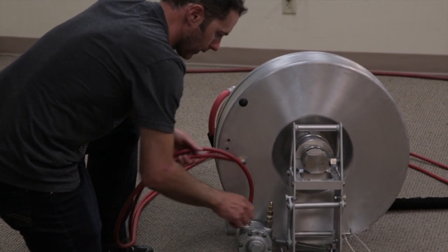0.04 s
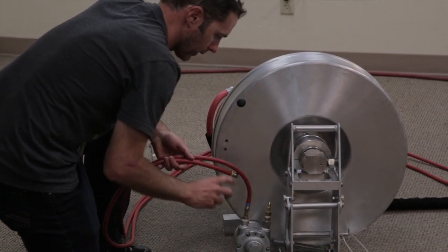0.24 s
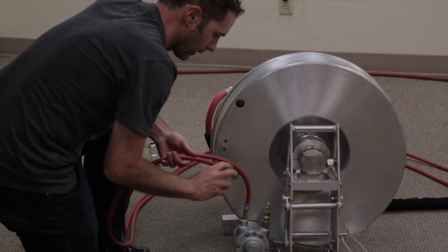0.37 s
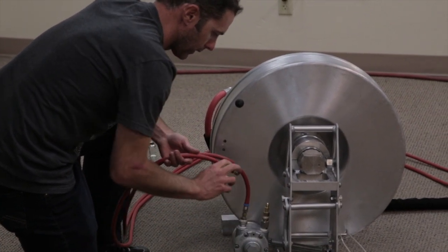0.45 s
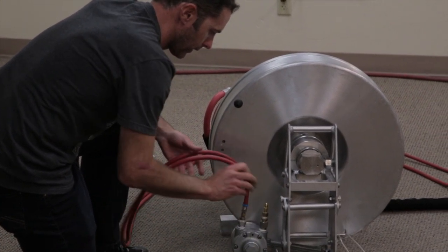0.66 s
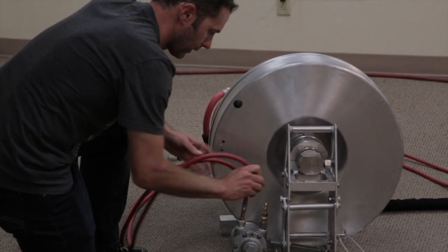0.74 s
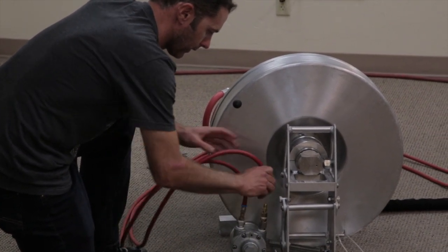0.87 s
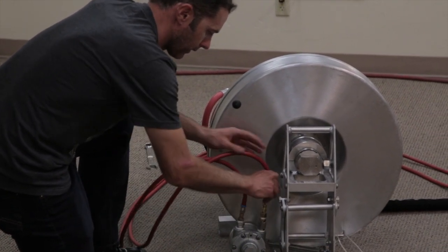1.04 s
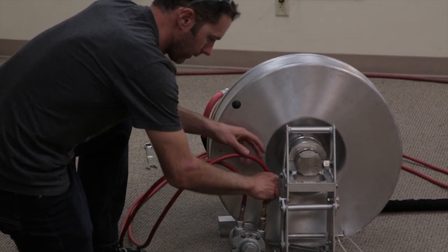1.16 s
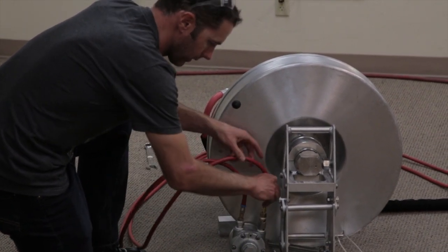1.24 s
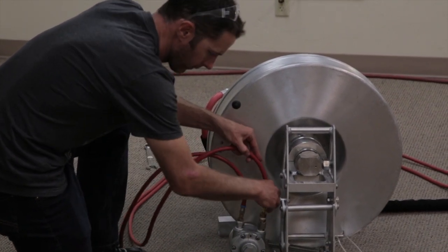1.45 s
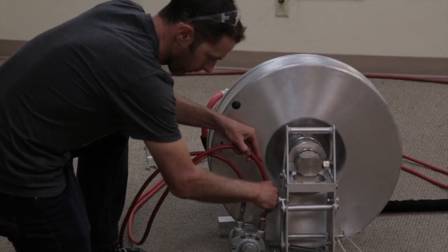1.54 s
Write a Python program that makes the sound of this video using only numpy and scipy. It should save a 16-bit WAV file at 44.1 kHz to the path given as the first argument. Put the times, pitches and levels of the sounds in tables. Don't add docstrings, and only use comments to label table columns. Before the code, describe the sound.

A metal hose coupling snaps loudly onto an air motor, then a second clicks and rattles

```python
import sys
import numpy as np
from scipy import signal
from scipy.io import wavfile

SR = 44100
rng = np.random.default_rng(int(sys.argv[2]) if len(sys.argv) > 2 else 0)


def generate_wav(sig):
    pcm = np.round(np.clip(np.atleast_2d(sig).T, -1, 1) * 32767).astype(np.int16)
    wavfile.write(sys.argv[1], SR, pcm)


def magnitude_from_level(level_db):
    exponent = np.asarray(level_db, float) / 20
    return 10 ** exponent


N = 70560

# [f/Hz, density/dB per Hz]
AIR_SPECTRUM = [(12, -43), (20, -20), (102, 10.5), (360, -10.5), (438, -13.5), (564, -13), (883, -28.5),
                (15000, -39), (16300, -34)]
# [f/Hz, density/dB per Hz]
CAPSULE_SPECTRUM = [(59, -94), (100, -61), (239, -26), (442, -6), (524, -9.5), (8460, -17), (16000, -29)]
# [t/s, sliding level/dB, dragging level/dB]
HOSE_EFFORT = [
    (.78, -63.5, -57),
    (.86, -59, -56),
    (.92, -53.5, -56.5),
    (1.0, -54, -54),
    (1.06, -58, -53),
    (1.14, -56.5, -47.5),
    (1.2, -58, -53.5),
    (1.4, -60.5, -84),
]
# [f/Hz, density/dB per Hz]
SLIDE_SPECTRUM = [(800, -42), (2000, 8.5), (3200, 8), (5000, 9.5), (8500, 8.5), (11000, 16), (15000, -22)]
# [f/Hz, density/dB per Hz]
DRAG_SPECTRUM = [(500, 8.5), (1000, 3.5), (2200, -3.5), (3200, -23), (5500, -12), (8000, -21), (15000, -14)]
SNAP_S = [
    .0542,
    .0553,
    .0566,
    .0581,
    .0597,
]
SNAP_DB = [
    -15,
    -13,
    -9.5,
    -17,
    -17.5,
]
# [f/Hz, level/dB, t60/s]
HOUSING_MODES = [(979, -3.5, 0.023), (1127, -1, 0.019), (1436, -3.5, 0.015), (1623, -8.5, 0.014),
                 (1820, -10, 0.016), (1992, -19.5, 0.059), (2290, -14.5, 0.033), (2480, -13.5, 0.022),
                 (2957, -11, 0.031), (3370, -4.5, 0.018), (3735, -13, 0.03), (4400, -8, 0.0086),
                 (5300, -15, 0.013), (6100, -36, 0.0078)]
# [f/Hz, level/dB, t60/s]
HOLLOW_MODES = [(405, -27, 0.015), (500, -19, 0.044), (563, -23.5, 0.061), (616, -10.5, 0.079),
                (730, -20.5, 0.024)]
# [f/Hz, level/dB, t60/s]
COVER_MODES = [(499.3, -33.5, 0.31), (559, -34, 0.22), (580.5, -26, 0.13), (633, -44, 0.67),
               (637, -58, 0.18), (682, -29, 0.24), (724.6, -43, 0.34), (788, -50, 0.37), (1488, -48, 0.44),
               (1966, -47, 0.19), (2560, -43, 0.24), (3132, -52.5, 0.67), (3320, -54.5, 0.83),
               (3670, -42.5, 0.23)]
# [f/Hz, density/dB per Hz]
SHIVER_SPECTRUM = [(300, -10.5), (600, 7), (1000, -12), (2000, -6), (3300, -3.5), (5000, -18.5),
                   (9000, -28.5), (15000, -34.5)]
# [t/s, length/s]
TICK_TIMES = [(.0544, .002), (.0572, .002), (.0676, .001), (.0771, .0004), (.197, .002), (.228, .002),
              (.2315, .002), (.2503, .002), (.2545, .003), (.261, .002), (.2845, .001), (.286, .0015),
              (.4425, .001), (.4838, .002), (.606, .0015), (.621, .001), (.6232, .0015), (.6427, .0005),
              (.646, .002), (.6482, .001), (.6497, .001), (.652, .004), (.6633, .0006), (.6727, .0004),
              (.674, .002), (.691, .003), (.6996, .0005), (.703, .0005), (.7478, .0015), (1.181, .004),
              (1.257, .0007), (1.2795, .002), (1.2942, .002), (1.2983, .002), (1.3035, .002),
              (1.5345, .003)]
# [level/dB, centre f/Hz, width/octaves]
TICK_SOUNDS = [(-28, 10000, 1.6), (-27, 10000, 1.2), (-37, 10000, .9), (-24, 8000, 1.7),
               (-54.5, 10000, 1.5), (-53, 4600, 1.8), (-57, 6500, 1.5), (-41, 7200, 1.4), (-42, 7500, 1.1),
               (-50, 9000, 1.6), (-52, 7500, 1.2), (-44, 7500, 1.3), (-54, 6500, 1.1), (-46, 4500, 1.8),
               (-51, 6500, 1.5), (-50, 6000, 1.9), (-48, 7500, .7), (-44, 9000, 1.9), (-46, 7200, 1.8),
               (-40, 7400, 1.9), (-32, 4500, 3.1), (-44, 5500, 2.2), (-35, 4200, 3.1), (-34, 4200, 3.1),
               (-46, 6500, 1.8), (-53, 6000, .9), (-52, 10500, .9), (-52, 4500, 1.5), (-46, 6000, 1.8),
               (-39, 4800, 2.2), (-36, 7000, 2.4), (-47, 8500, .9), (-37, 5500, 2.1), (-27, 5200, 2.4),
               (-32, 9500, .9), (-45, 6500, 1.3)]
# [f/Hz, t60/s]
HALL_DECAY = [(301, 0.91), (601, 0.33), (1501, 0.22), (3501, 0.22), (8001, 0.2), (15001, 0.08)]
# [t/s, level/dB, f/Hz, length/s]
SQUEAKS = [
    (1.12, -55, 600, .025),
    (1.571, -51, 2950, .014),
    (1.580, -52, 2500, .009),
    (1.594, -55, 2800, .006),
    (.775, -57, 1100, .01),
    (.670, -53, 1100, .014),
    (.648, -54, 1150, .01),
]
KNOCK_S = [1.1812, 1.1835, 1.1868, 1.257, 1.2942, 1.2982, 1.2997, 1.3015, 1.305, 1.533, 1.5352]
# [body level/dB, brass level/dB, favoured body f/Hz]
KNOCK_SOUNDS = [(-44, -44.5, 2600), (-40.5, -43, 1600), (-28.5, -42.5, 1650), (-35.5, -42.5, 2300),
                (-36, -48, 780), (-27, -27, 1790), (-23, -29, 1500), (-25, -25.5, 1210), (-39, -41, 2400),
                (-34.5, -56, 770), (-32.5, -63, 1050)]
# [f/Hz, level/dB, t60/s]
BODY_MODES = [(1070, -1, 0.049), (1106, -1.5, 0.023), (1271, -1, 0.042), (1343, -3.5, 0.038),
              (1378, -1.5, 0.046), (1483, -1, 0.029), (1600, -13.5, 0.025), (1640, -24, 0.031),
              (1817, -5, 0.065), (2150, -13, 0.043), (2240, -7, 0.0074), (2550, -5.5, 0.018)]
# [f/Hz, level/dB, t60/s]
BRASS_MODES = [(4090, -0.5, 0.014), (4368, -2.5, 0.035), (4512, -5, 0.061), (4683, -2.5, 0.09),
               (4900, -5.5, 0.035), (5190, 0, 0.026), (5230, -13, 0.017), (6790, -11.5, 0.074),
               (7897, -9, 0.065), (8010, -14.5, 0.15), (9200, -9.5, 0.042), (10430, -27, 0.033),
               (11100, -19, 0.022), (13000, -27, .04)]
# [t/s, body level/dB, brass level/dB]
GRIND_EFFORT = [
    (.98, -96, -89),
    (1.08, -84.5, -84),
    (1.17, -79.5, -82),
    (1.25, -71.5, -90),
    (1.259, -69, -75),
    (1.294, -59.5, -61),
    (1.33, -65, -70),
    (1.45, -77.5, -91),
    (1.6, -79, -103),
]
# [t/s, level/dB]
FRAME_HITS = [
    (1.195, -52),
    (1.299, -41),
    (1.412, -47),
    (1.537, -46),
]
# [t/s, level/dB, f/Hz, t60/s]
THUMPS = [
    (1.422, -32.5, 81.3, 0.35),
]


def rms_one(x):
    return x / np.sqrt(np.mean(x ** 2) + 1e-20)


def at_hz(points, hz):
    table_hz, value = np.transpose(points)
    return np.interp(np.log(hz), np.log(table_hz), value)


def band(x, low_hz, high_hz):
    edges_hz = [low_hz, min(high_hz, 0.45 * SR)]
    return signal.sosfilt(signal.butter(2, edges_hz, "band", fs=SR, output="sos"), x)


def ring(clicks, hz, t60_s):
    r, w = magnitude_from_level(-60 / (t60_s * SR)), 2 * np.pi * hz / SR
    return signal.lfilter([0, np.sin(w)], [1, -2 * r * np.cos(w), r * r], clicks + 1e-18)


def struck(times_s, db, modes, favour_hz=None):
    out = np.zeros(N)
    at = (np.asarray(times_s) * SR).astype(int)
    spread_db = 2.5 * rng.standard_normal((len(times_s), len(modes)))
    for k, (hz, level_db, t60_s) in enumerate(modes):
        if favour_hz is None:
            off_db, sign = 0, (-1) ** k
        else:
            off_db, sign = 24 * np.abs(np.log2(hz / favour_hz)), 1
        clicks = np.zeros(N)
        clicks[at] = sign * magnitude_from_level(db + level_db - off_db + spread_db[:, k])
        out += ring(clicks, hz, t60_s)
    return out


def grains(per_s, spread_db):
    sizes = magnitude_from_level(spread_db * np.minimum(rng.exponential(1, N), 4)) * rng.choice([-1, 1], N)
    return rms_one(sizes * (rng.random(N) < per_s / SR))


def coloured(spectrum, patchy_db):
    out, settle = 0, 8000
    white = rng.standard_normal((2, N + settle))
    for k, low_hz in enumerate(20 * 2 ** np.arange(0, 10, 0.5)):
        flicker = np.interp(np.arange(N), np.linspace(0, N, 30), rng.standard_normal(30))
        gain = magnitude_from_level(at_hz(spectrum, low_hz * 2 ** 0.25) + patchy_db * flicker)
        out = out + gain * band(white[k % 2], low_hz, low_hz * 2 ** 0.5)[settle:]
    return rms_one(out)


def air():
    centre_hz, width_hz, settle = 93.4, 30, 8000
    white = rng.standard_normal(N + settle)
    duct = band(white, centre_hz - width_hz / 2, centre_hz + width_hz / 2)[settle:]
    return magnitude_from_level(-45.5) * coloured(AIR_SPECTRUM, patchy_db=-0.5) + magnitude_from_level(-51.5) * rms_one(duct)


def capsule_hiss():
    return magnitude_from_level(-69) * coloured(CAPSULE_SPECTRUM, patchy_db=0.5)


def rubbing():
    t = np.arange(N) / SR
    when_s, slide_db, drag_db = np.transpose(HOSE_EFFORT)
    slide = coloured(SLIDE_SPECTRUM, patchy_db=0)
    drag = band(coloured(DRAG_SPECTRUM, patchy_db=1), 400, 16000)
    return magnitude_from_level(np.interp(t, when_s, slide_db)) * slide + magnitude_from_level(np.interp(t, when_s, drag_db)) * drag


def snap():
    crack_db, crack_s, crack_hz = -12.5, 0.017, 1360
    shiver_db, shiver_t60_s = -41, 0.9
    age = np.arange(N) / SR - SNAP_S[0]
    started = age > 0
    crack = rng.standard_normal(N) * started * np.exp(-3 * np.abs(age) / crack_s)
    shiver = coloured(SHIVER_SPECTRUM, patchy_db=1) * started
    shiver = shiver * magnitude_from_level(shiver_db - 60 * np.abs(age) / shiver_t60_s)
    rings = struck(SNAP_S, np.array(SNAP_DB), HOUSING_MODES)
    rings += struck(SNAP_S[:1], 0, HOLLOW_MODES)
    rings += struck(SNAP_S[2:3], 0, COVER_MODES)
    rings += magnitude_from_level(crack_db) * band(crack, crack_hz / 3, crack_hz * 3)
    return band(rings, 300, 16000) + shiver


def ticks():
    size, lead = 2048, 5
    out, age = np.zeros(N + size), np.arange(size) / SR
    crackle = grains(per_s=5000, spread_db=3)
    for (s, length_s), (db, hz, octaves) in zip(TICK_TIMES, TICK_SOUNDS):
        i = int(s * SR)
        wide = 2 ** (max(octaves, 0.3) / 2)
        fade_s = 0.4 * length_s + 0.0003
        burst = np.clip(crackle[i:i + size], -4, 4) * np.exp(-np.maximum(age - length_s, 0) / fade_s)
        burst[2:4] += lead * np.array([1, -0.5])
        burst = band(burst, hz / wide, hz * wide)
        burst = band(burst, hz / wide / 1.3, hz * wide * 1.3)
        out[i:i + size] += magnitude_from_level(db + 3) * burst
    return band(out[:N], 400, 12000)


def hall(x):
    onset_s = 0.0021
    t, tail = np.arange(SR) / SR, 0
    for low_hz in 200 * 2 ** np.arange(0, 6.5, 0.5):
        noise = band(rng.standard_normal(SR), low_hz, low_hz * 2 ** 0.5)
        tail = tail + noise * magnitude_from_level(-60 * t / at_hz(HALL_DECAY, low_hz * 2 ** 0.25))
    tail = tail * np.clip(t / onset_s, 0, 1) ** 2
    return signal.fftconvolve(x, tail / np.sqrt(np.sum(tail ** 2)))[:N]


def squeaks():
    t, out = np.arange(N) / SR, 0
    for s, db, hz, length_s in SQUEAKS:
        swell = np.sin(np.pi * np.clip((t - s) / length_s, 0, 1))
        tone = rms_one(ring(rng.standard_normal(N), hz, 20 / hz))
        out = out + magnitude_from_level(db) * swell * tone
    return out


def coupling():
    body_db, brass_db, favour_hz = np.transpose(KNOCK_SOUNDS)
    out = band(struck(KNOCK_S, body_db, BODY_MODES, favour_hz), 916, 2600)
    out += band(struck(KNOCK_S, brass_db, BRASS_MODES), 2700, 15000)
    t = np.arange(N) / SR
    when_s, *efforts_db = np.transpose(GRIND_EFFORT)
    for modes, effort_db in zip((BODY_MODES, BRASS_MODES), efforts_db):
        effort = magnitude_from_level(np.interp(t, when_s, effort_db, left=-200))
        for hz, level_db, t60_s in modes:
            scrape = effort * grains(per_s=2000, spread_db=4.6) * magnitude_from_level(level_db)
            out += ring(scrape, hz, t60_s / 2)
    return out


def frame():
    frame_hz, t60_s, rise_s = 922, 0.45, 0.008
    t, level = np.arange(N) / SR, 0
    for s, db in FRAME_HITS:
        age = np.maximum(t - s, 0)
        hit = magnitude_from_level(db - 60 * age / t60_s) * np.clip(age / rise_s, 0.3, 1)
        level = np.where(t > s, hit, level)
    return band(level * np.sin(2 * np.pi * frame_hz * t), 860, 990)


def thumps():
    return sum(band(struck([s], db, [(hz, 0, t60_s)]), 40, 220) for s, db, hz, t60_s in THUMPS)


def scene():
    hall_db, hall_side_db, air_side_db = -14, -43, -45
    near = snap() + ticks() + coupling() + squeaks() + frame()
    mid = near + magnitude_from_level(hall_db) * hall(near) + rubbing() + thumps() + air()
    side = capsule_hiss() + magnitude_from_level(hall_side_db + hall_db) * hall(near) + magnitude_from_level(air_side_db) * air()
    return mid + side * [[1], [-1]]


def low_pass(x):
    return signal.sosfilt(signal.butter(12, 16480, fs=SR, output="sos"), x)


def record(dry):
    top = signal.cheby2(8, 22, 16000, fs=SR, output="sos")
    mix = signal.sosfilt(top, dry)
    return low_pass(mix)


dry = scene()
out = record(dry)
generate_wav(out)
```